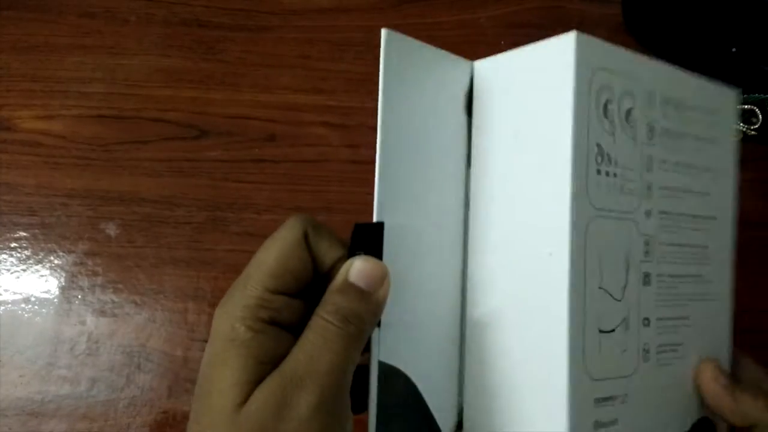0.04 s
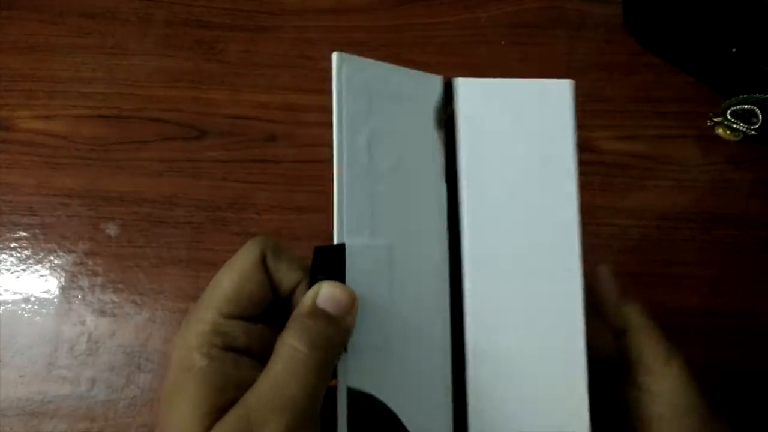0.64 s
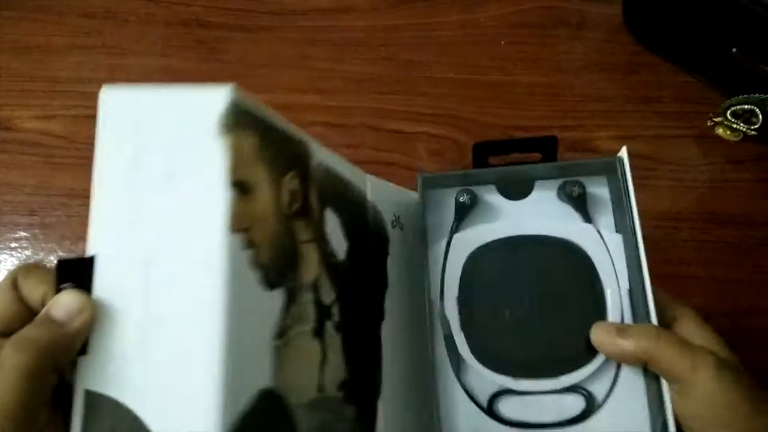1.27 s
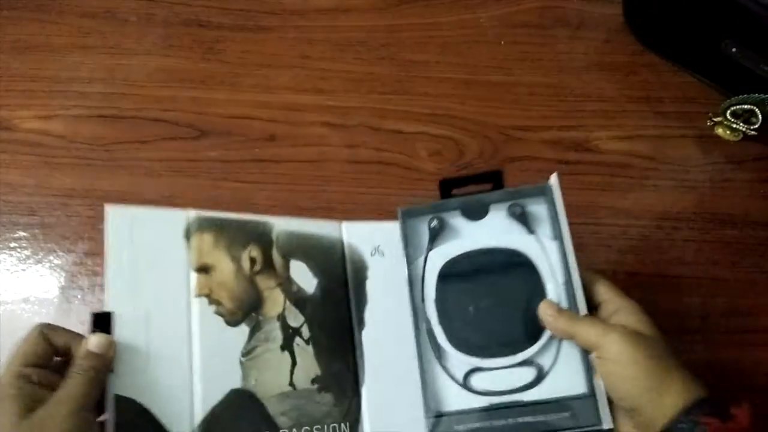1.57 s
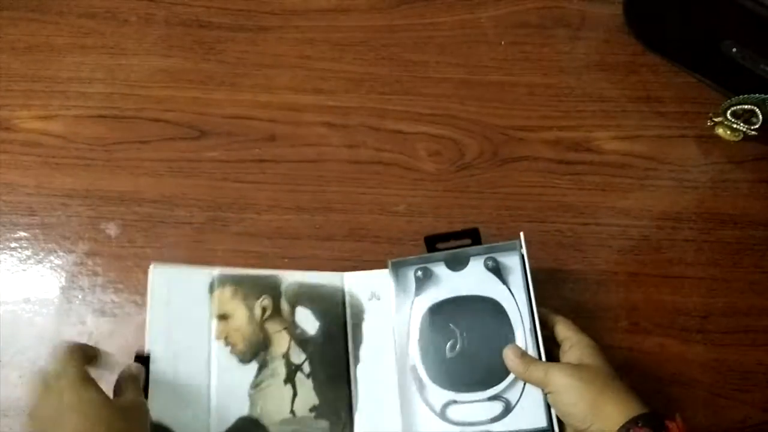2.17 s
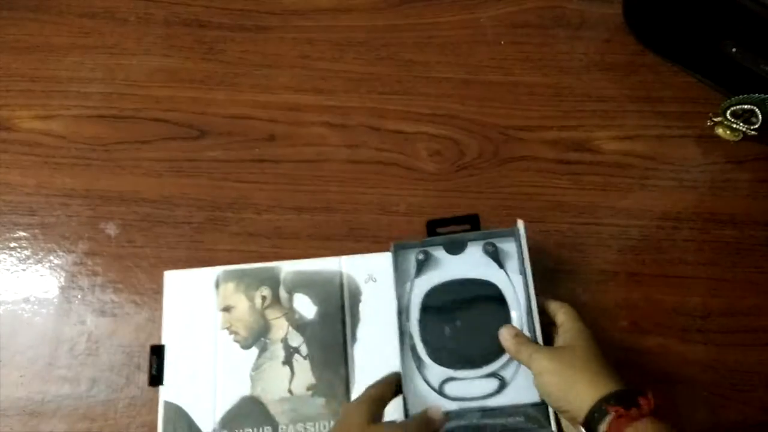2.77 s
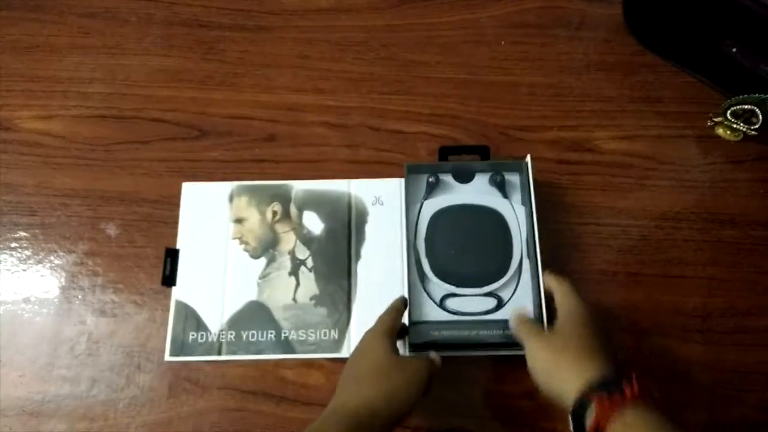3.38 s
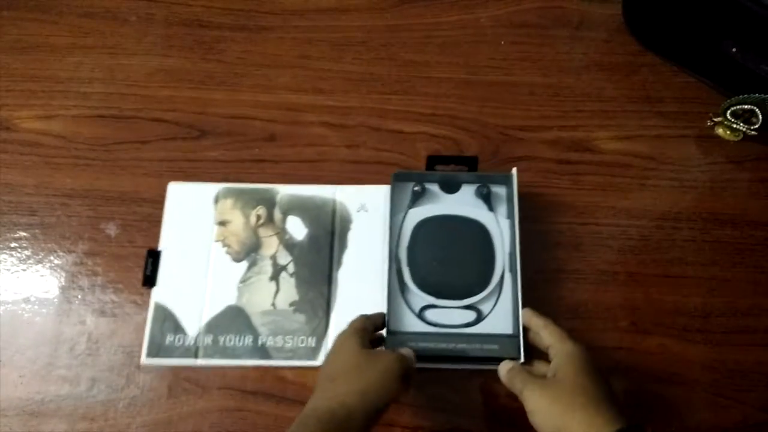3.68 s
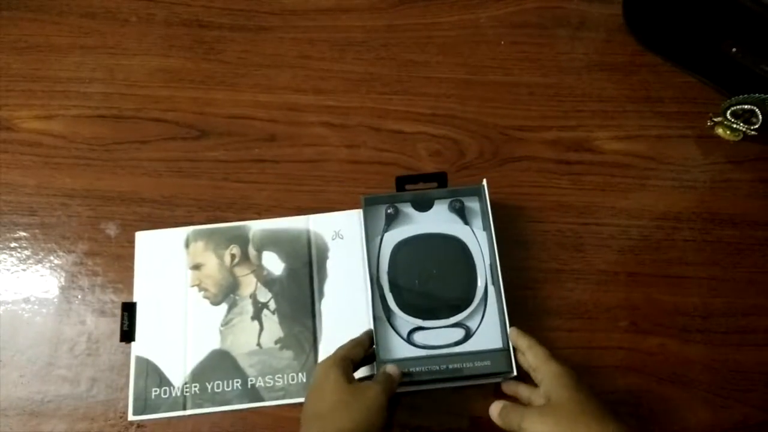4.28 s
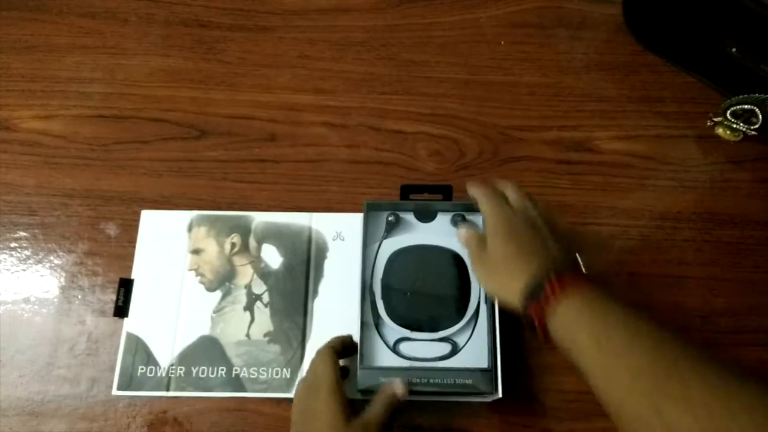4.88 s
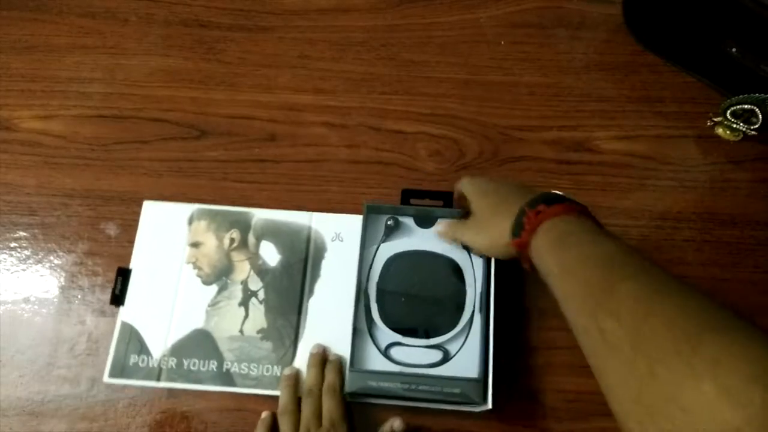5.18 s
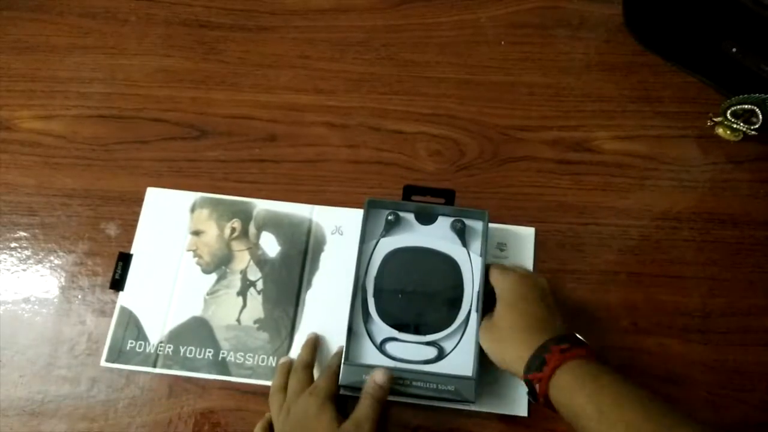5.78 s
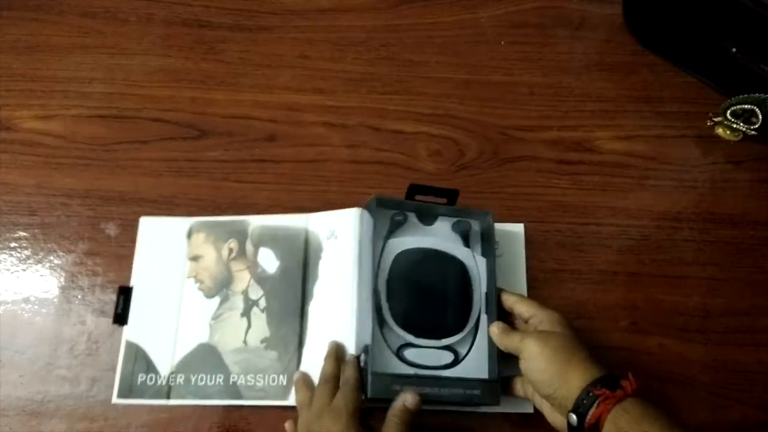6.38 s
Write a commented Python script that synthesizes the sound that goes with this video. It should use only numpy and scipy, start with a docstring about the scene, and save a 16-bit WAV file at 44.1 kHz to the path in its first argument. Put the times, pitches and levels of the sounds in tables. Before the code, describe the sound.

Soft cardboard rubbing and scraping, broken by light knocks, sharp clicks and low thumps on a table, over a faint hum.

```python
"""A low drone sinks away under the soft hiss of sliding card: a cardboard box with a plastic window is
being unfolded on a wooden table in a small bare room. Faces rub, edges scrape, panels knock, and the
cover's plastic tab snaps onto the wood and rings. The hollow box rumbles as hands push it, squeals
thinly as it turns, and is set down with thumps that boom in the low modes of table and room.
A faint hum and hiss lie underneath."""
import sys
import numpy as np
from scipy import signal
from scipy.fft import rfft, irfft, next_fast_len
from scipy.io import wavfile
from scipy.ndimage import uniform_filter1d, map_coordinates

SR = 44100
rng = np.random.default_rng(int(sys.argv[2]) if len(sys.argv) > 2 else 0)


def put_to_file(sound):
    """Save the sound as 16-bit audio at rate SR, in the file named by the first command-line argument."""
    columns = np.atleast_2d(sound).T  # one column per channel
    safe = np.clip(columns, -1, 1)
    whole_steps = np.round(safe * 32767)
    wavfile.write(sys.argv[1], SR, whole_steps.astype(np.int16))


N = 292691

# Room tone, steady hum and opening drone: f/Hz, rms level/dB
HUM_TONES = [(72, -69), (100, -81), (240, -81), (300, -77)]
DRONE_TONES = [(236, -69), (296, -68.5)]
# Reverb decay: f/Hz, t60/s
ROOM_DECAY = [(100, 1), (300, 0.97), (700, 0.73), (2000, 0.85), (6000, 0.6), (10000, 0.58), (16000, 0.45)]
# Stereo image of diffuse and of direct sound: f/Hz, left-right correlation
DIFFUSE_IMAGE = [(100, 0.89), (300, 0.81), (600, 0.53), (1200, 0.0065), (3000, 0.045), (16000, 0)]
DIRECT_IMAGE = [(100, 0.98), (500, 1), (1200, 0.12), (5000, 0.07), (16000, 0.039)]
# Stereo balance: f/Hz, left minus right/dB
BALANCE = [(60, 5.5), (150, 1), (700, 1.5), (2000, 2.5), (4800, 2), (5900, -1), (7700, -5), (10000, -1.5),
           (15000, -4)]

# Noise colours: f/Hz, relative level/dB
ROOM_TONE_EQ = [(20, -18), (35, -19), (55, 7), (78, -12), (130, 0.5), (200, -6), (300, -4.5), (600, -18.5),
                (1100, -14.5), (3900, -19.5), (6400, -16.5), (10000, -25), (16000, -25)]  # background hiss
REVERB_EQ = [(40, -2), (100, 0.5), (300, 3.5), (700, 0.5), (1300, 1.5), (3000, -3.5), (6500, -4.5),
             (9000, -3.5), (16000, -3)]  # the room's reflections
RUMBLE_EQ = [(20, -32), (38, -12), (55, -3.5), (72, -1.5), (100, 3), (125, -10.5), (160, -3), (260, -58.5),
             (600, -44)]  # box pushed over the table top
HOLLOW_EQ = [(110, 4.5), (200, 2.5), (320, 2.5), (480, -1), (650, -1.5), (1000, -13.5), (1800, -28.5)]  # rubbing heard through the hollow box
SCRAPE_EQ = [(500, -10.5), (1000, -1.5), (1600, 1.5), (2300, -1), (4000, -3.5), (6000, -2), (9000, -15),
             (16000, -60)]  # card edges
PAPER_EQ = [(1500, -23), (3300, -7.5), (5000, -3.5), (6300, 1), (8000, -3), (10000, -10), (13000, -11.5),
            (15800, -6)]  # coated faces
SIZZLE_EQ = [(3000, -29), (6500, 4), (8500, 3), (11000, 2.5), (15800, -2.5)]  # top end of fast strokes
THUD_EQ = [(40, -33), (100, -4.5), (210, -2), (340, -6.5), (470, -13), (640, -10.5), (1100, -23),
           (2500, -49)]  # soft, heavy contact
CRACK_EQ = [(200, -18), (400, -4), (620, -10), (950, -3.5), (1600, -24), (2030, -6), (2400, -7),
            (3900, -3.5), (4600, -4), (6000, 1), (7500, -7), (8800, -12.5), (11000, -24), (16000, -26.5)]  # hard edge contact
# Colours that follow a pitch: multiple of that pitch, relative level/dB
RASP_EQ = [(.3, -39), (.6, -4), (.8, 2), (1.2, 3), (1.5, -6), (2.2, -27)]  # dragged edge
PANEL_EQ = [(.2, -20), (.5, -12), (1, 1.5), (1.5, -9.5), (2.5, -12.5), (4.5, -24), (10, -55)]  # papery crack of a knock

# Hands push the box: start/s, hold/s, rumble level/dB, hollow rub level/dB
BOX_PUSHES = [(0, 0.57, -75, -67.5), (0.867, 0.32, -72, -69), (1.35, 0.3, -71, -70.5),
              (1.85, 0.9, -66.5, -65.5), (2.797, 0.8, -57.5, -66), (3.553, 0.57, -57, -62),
              (4.116, 1, -61, -64), (5.02, 0.3, -53.5, -57.5), (5.464, 0.3, -55.5, -64.5),
              (6.037, 0.4, -59.5, -56), (6.425, 0.2, -57.5, -60.5)]
# Thin squeal of the turning box: t/s, f/Hz, level/dB
SQUEAL_PATH = [(4.51, 14000, -86), (4.545, 14450, -63), (4.59, 15700, -66), (4.665, 15500, -65),
               (4.715, 13900, -63), (4.77, 14160, -78), (4.83, 13800, -70), (4.875, 14300, -66),
               (4.92, 15600, -66), (5.02, 15000, -71), (5.12, 15800, -80), (5.24, 15300, -69),
               (5.31, 14000, -69), (5.36, 13000, -90)]
# Squeaks of the plastic window: start/s, length/s, level/dB, f/Hz
WINDOW_SQUEAKS = [(2.123, 0.063, -68, 7100), (4.76, .19, -71, 6100)]
# Strokes of card and fingers: t/s at top speed, rise/s, fall/s, hiss level/dB, scrape level/dB
CARD_STROKES = [(.17, 0.19, 0.087, -64, -75), (.335, 0.017, 0.062, -61, -79),
                (.405, 0.044, 0.18, -55, -72.5), (.64, 0.11, 0.059, -65.5, -78),
                (.88, 0.037, 0.11, -58, -70), (1.01, 0.12, 0.14, -60, -72), (1.16, 0.11, .13, -54, -79),
                (1.25, 0.11, 0.12, -53.5, -84), (1.42, 0.097, 0.22, -60, -68.5),
                (1.63, .14, 0.12, -57.5, -83.5), (1.72, 0.15, 0.13, -59, -89),
                (1.92, 0.12, 0.088, -66, -74.5), (2.22, 0.033, 0.033, -65, -76),
                (2.9, 0.21, 0.14, -64, -62.5), (3.06, 0.16, 0.11, -54.5, -62),
                (3.2, 0.11, 0.12, -57.5, -61.5), (3.47, 0.42, 0.16, -62.5, -78),
                (3.7, 0.18, 0.34, -65, -63.5), (3.878, 0.044, 0.21, -60, -61),
                (4.57, 0.11, 0.79, -63.5, -63.5), (4.93, 0.075, 0.73, -65, -64),
                (5.14, 0.1, 0.11, -56, -61), (5.3, 0.23, 0.072, -64.5, -60.5),
                (5.437, 0.0081, 0.027, -57.5, -65), (5.599, 0.28, 0.14, -58, -65),
                (5.741, 0.0065, 0.07, -57.5, -58), (5.8, 0.06, 0.12, -53, -75),
                (5.91, 0.12, 0.11, -57, -57), (6.17, 0.2, 0.13, -65.5, -61.5),
                (6.3, 0.016, 0.054, -61.5, -61.5), (6.391, 0.042, 0.065, -64, -59.5),
                (6.49, 0.068, 0.07, -63, -71)]
# A card edge catches and drags: start/s, hold/s, level/dB, centre f/Hz
EDGE_DRAGS = [(4.557, 0.051, -63, 3240), (5.43, 0.014, -57, 4600), (5.748, 0.058, -53, 5200),
              (6.282, 0.0083, -57.5, 4600), (6.464, 0.018, -58.5, 4930)]
# Panels knocked by fingers and table: t/s, level/dB, f/Hz, cycles to fall 60 dB
PANEL_KNOCKS = [(.315, -56, 513, 8.7), (.783, -57.5, 1120, 38), (.785, -61, 615, 20),
                (.9245, -45.5, 530, 21), (1.286, -39.5, 948, 42), (1.29, -51, 310, 35),
                (1.348, -52.5, 580, 22), (1.785, -59.5, 600, 22), (1.914, -57, 650, 17),
                (2.361, -34.5, 900, 43), (2.367, -37.5, 587, 160), (2.368, -41.5, 156, 120),
                (2.534, -55, 1300, 19), (2.5375, -42, 630, 8.4), (2.5415, -44.5, 1100, 22),
                (2.857, -53.5, 920, 12), (3.2145, -44, 630, 16), (3.2249, -43.5, 980, 14),
                (3.227, -36, 640, 25), (3.564, -54, 735, 23), (3.722, -56.5, 1350, 29),
                (3.7734, -47.5, 1490, 28), (3.870, -48, 670, 14), (4.0066, -54, 704, 28),
                (4.0443, -44, 700, 17), (4.578, -52, 625, 71), (5.013, -57, 686, 40),
                (5.138, -43, 790, 10.5), (5.146, -44.5, 650, 25), (5.182, -49, 790, 20),
                (5.276, -53.5, 600, 11), (5.3107, -51, 850, 8.9), (5.4284, -55, 747, 22),
                (5.637, -58, 910, 8.9), (5.767, -49, 680, 15), (5.7981, -33, 3820, 37),
                (5.8212, -31.5, 3600, 14), (5.8225, -49, 795, 26), (5.829, -35.5, 725, 37),
                (6.2447, -55, 624, 15), (6.299, -52, 680, 36), (6.3879, -40.5, 547, 19),
                (6.476, -53, 750, 67), (6.6245, -41, 630, 62)]
# Sharp contacts of plastic and card edges: t/s, level/dB, t60/s, top treble boost/dB
EDGE_CLICKS = [(0.192, -50.5, 0.028, 33), (.783, -63, .015, 15), (0.8848, -48.5, 0.014, 11),
               (1.2851, -45.5, 0.02, 2), (2.1292, -57.5, 0.031, -1), (2.3607, -22, 0.013, 8),
               (2.362, -21.5, 0.01, 11.5), (2.3641, -24, 0.0076, -5), (2.3671, -28, 0.029, -21),
               (2.533, -38.5, 0.0056, 44), (2.857, -53.5, 0.038, -21), (2.941, -60, .03, -15),
               (3.2244, -48.5, 0.051, 8), (3.7729, -39, 0.059, 20.5), (3.984, -58, .015, 19),
               (4.234, -63, .02, -5), (4.372, -61, 0.021, -15), (5.138, -48.5, 0.04, 9),
               (5.31, -52, .018, 9.5), (5.798, -36.5, 0.039, 22), (5.8074, -37.5, 0.055, -23),
               (5.8209, -30, 0.048, -2), (6.497, -52.5, 0.037, 13), (6.57, -49, 0.024, 22),
               (6.584, -50.5, 0.059, 23), (6.622, -44, 0.071, 0)]
# The box's weight lands: t/s, boom send/dB, thud level/dB, air push level/dB, ring time factor
BOX_LANDINGS = [(.893, -58.5, -54.5, -61, 0.32), (1.287, -54.5, -59, -57, 0.18),
                (2.128, -46, -61, -60, 0.56), (2.364, -47.5, -36, -33, 1),
                (2.535, -37.5, -42.5, -28.5, 0.89), (3.2256, -33.5, -34.5, -23, 0.96),
                (4.044, -56.5, -50.5, -55, 0.81), (4.585, -50.5, -49.5, -56, 0.73),
                (5.013, -52.5, -55.5, -50, 1.2), (5.136, -48.5, -60, -48, 0.42),
                (5.335, -45.5, -71, -56, 0.4), (5.826, -44.5, -53, -54, 0.78),
                (6.388, -55.5, -49, -39, 1.5), (6.626, -60, -61, -50, .5)]
# Ringing modes: f/Hz, relative level/dB, t60/s
TAB_MODES = [(554, -14, 0.79), (930, -3, 0.58), (1116, -2, 0.25), (1810, 4, 0.14), (2055, -1, 0.24),
             (2660, -11, 0.27), (2815, 5, 0.17), (3600, 5, 0.16), (4960, 2, 0.15), (5340, -3, 0.11),
             (5700, -7, 0.2), (5860, 5, 0.17), (6290, -3, 0.27), (6800, -3, 0.19)]  # cover and plastic tab
BOOM_MODES = [(54, -15, 2.1), (90.9, -7, 1.98), (103.6, 4, 0.71), (141.6, -12, 1.8), (158.3, -14.5, 1.57),
              (199, -22.5, 1.8), (240.7, -22.5, 1.13), (309, -21.5, 1.1), (365, -12.5, 0.51),
              (556, -19, 0.57), (613, -12, 0.27)]  # table and room


def amp(db):
    """Decibels to gain."""
    return 10 ** (np.asarray(db) / 20)


def unit(x):
    """x at rms 1."""
    return x / np.sqrt(np.mean(x ** 2) + 1e-20)


def peak_one(x):
    """A hit scaled to rms 1 in its loudest 3 ms."""
    return x / np.sqrt(uniform_filter1d(np.mean(x ** 2, 0), size=132).max())


def along(points, hz):
    """Read (f/Hz, value) points on a log frequency axis."""
    freqs, values = np.transpose(points)
    return np.interp(np.log(hz + 1), np.log(freqs + 1), values)


def wobble(rate):
    """Smooth random modulation, rate knots a second."""
    return map_coordinates(rng.standard_normal(int(N * rate / SR) + 4), [np.arange(N) * rate / SR])


def fade(t, t60):
    """Exponential decay, 60 dB down at t60."""
    return np.exp(-np.log(1000) * t / max(t60, 1e-3))


def swell_db(gestures, growth=1):
    """Summed level of (start/s, attack/s, hold/s, release/s, level/dB) moves; gain is speed ** growth."""
    t, power = np.arange(N) / SR, np.full(N, amp(-120) ** 2)
    for s, attack, hold, release, db in gestures:
        speed = np.interp(t, s + np.cumsum([0, attack, hold, release]), [0, 1, 1, 0])
        power += (amp(db) * speed ** growth) ** 2
    return 10 * np.log10(power)


def add(track, s, sound):
    """Mix a sound into the track from time s on."""
    part = track[:, max(round(s * SR), 0):][:, :sound.shape[-1]]
    part += sound[..., :part.shape[1]]


def colour(pair, eq, image):
    """Give two unrelated noises a minimum-phase EQ and a stereo image, at rms 1."""
    n = pair.shape[1]
    m = 2 * next_fast_len(n // 2 + 2048)
    hz = np.fft.rfftfreq(m, 1 / SR)
    cepstrum = irfft(np.log(amp(along(eq, hz))))
    cepstrum[1:m // 2] *= 2
    cepstrum[m // 2 + 1:] = 0  # no pre-ring
    width = np.arccos(np.clip(along(image, hz), -1, 1)) / 2
    shaped = rfft(pair, m) * np.exp(rfft(cepstrum))
    mid, side = irfft(shaped * [np.cos(width), np.sin(width)])[:, :n]
    return unit(np.array([mid + side, mid - side]))


def room_tone(hiss_db=-65.5, drone_hold_s=0.22, drone_release_s=0.15, drone_waver_db=3):
    """The bed: steady hiss, a slightly wavering hum, and a low drone that soon sinks away."""
    t = np.arange(N) / SR
    tone = lambda hz: np.sqrt(2) * np.sin(2 * np.pi * hz * t + wobble(2.81))
    hum = sum(amp(db) * tone(hz) for hz, db in HUM_TONES)
    drone = sum(amp(db + drone_waver_db * wobble(16.7)) * tone(hz) for hz, db in DRONE_TONES)
    drone *= np.clip(1 - (t - drone_hold_s) / drone_release_s, 0, 1)
    hiss = amp(hiss_db) * colour(rng.standard_normal((2, N)), ROOM_TONE_EQ, DIFFUSE_IMAGE)
    return hum + drone + hiss


def room_tails(count=6, build_s=0.0012):
    """Reverb tails for several spots on the table: quick to build, longest in the bass."""
    noise = np.array([colour(rng.standard_normal((2, SR)), REVERB_EQ, DIFFUSE_IMAGE)
                      for _ in range(count)])
    hz, t, bands = signal.stft(noise, SR, nperseg=256)
    decay = np.exp(-np.log(1000) * t / along(ROOM_DECAY, hz)[:, None])
    tails = signal.istft(bands * decay * (1 - np.exp(-t / build_s)), SR, nperseg=256)[1]
    return tails / np.linalg.norm(tails, axis=-1, keepdims=True)


def in_room(hit, tails, wet_db, smooth_bins=260):
    """A dry hit plus one of the room's tails, which takes on only the hit's broad colour."""
    lead = SR // 10
    tail = np.pad(tails[rng.integers(len(tails))], ((0, 0), (lead, 0)))
    m = next_fast_len(tail.shape[1])
    power = uniform_filter1d(np.mean(np.abs(rfft(hit, m)) ** 2, 0), size=smooth_bins)
    out = amp(wet_db) * irfft(rfft(tail, m) * np.sqrt(np.abs(power)), m)[:, lead:]
    add(out, 0, hit)
    return out


def patchy(x, depth_db=2.3):
    """The colour of a rub shifts in patches as the contact wanders over the surface."""
    bands = signal.stft(x, nperseg=512)[2]
    patches = uniform_filter1d(rng.standard_normal(bands.shape[1:]), size=4, axis=0)
    patches = uniform_filter1d(patches, size=9, axis=1)
    return signal.istft(bands * amp(depth_db * unit(patches)), nperseg=512)[1][:, :N]


def friction(eq, catches_per_s, grain_db, grip_db):
    """Rubbing at rms 1: countless tiny slips and some larger catches, under a fluttering grip."""
    caught = rng.random(N) < catches_per_s / SR
    catches = caught * rng.exponential(1, (2, N)) * rng.choice([-1, 1], N)
    slips = patchy(rng.standard_normal((2, N))) + amp(grain_db) * unit(catches)
    return colour(slips * amp(grip_db * wobble(110)), eq, DIFFUSE_IMAGE)


def box_rumble(attack_s=0.26, release_s=0.17):
    """The hollow box and the table top rumble for as long as the hands push."""
    rumble_db = swell_db([(s - attack_s, attack_s, hold, release_s, db) for s, hold, db, _ in BOX_PUSHES])
    rub_db = swell_db([(s - attack_s, attack_s, hold, release_s, db) for s, hold, _, db in BOX_PUSHES])
    rumble = amp(rumble_db) * friction(RUMBLE_EQ, catches_per_s=21, grain_db=-21, grip_db=2)
    rub = amp(rub_db) * friction(HOLLOW_EQ, catches_per_s=40, grain_db=-11, grip_db=2.2)
    return rumble + rub


def fuzzy_tone(hz, width_hz):
    """A stereo tone smeared into a narrow band by fast pitch jitter."""
    jitter = np.array([wobble(900), wobble(900)])
    return np.sin(2 * np.pi * np.cumsum(hz + width_hz * jitter, axis=1) / SR)


def squeals(flicker_db=5.5, waver_hz=170):
    """The turning box squeals at the top of hearing; its plastic window adds short, lower squeaks."""
    t = np.arange(N) / SR
    times, pitches, levels = np.transpose(SQUEAL_PATH)
    gate = (t > times[0]) & (t < times[-1])
    level_db = np.interp(t, times, levels) + flicker_db * (wobble(28) + wobble(170)) / 2
    pitch_hz = np.interp(t, times, pitches) + waver_hz * wobble(45)
    out = gate * amp(level_db) * fuzzy_tone(pitch_hz, width_hz=330)
    for s, length, db, hz in WINDOW_SQUEAKS:
        arch = np.sin(np.pi * np.clip((t - s) / length, 0, 1))
        out += amp(db) * arch * fuzzy_tone(hz, width_hz=70)
    return out


def card_slides(brisk_hiss_db=-54, brisk_sizzle_db=-58, sizzle_growth=2.65):
    """Edges scrape and coated faces hiss with the speed of each stroke; faster strokes are brighter."""
    hiss_db = swell_db([(s - rise, rise, 0, fall, db) for s, rise, fall, db, _ in CARD_STROKES],
                       growth=0.76)
    scrape_db = swell_db([(s - rise, rise, 0, fall, db) for s, rise, fall, _, db in CARD_STROKES],
                         growth=0.35)
    sizzle_db = brisk_sizzle_db + sizzle_growth * (hiss_db - brisk_hiss_db)
    scrape = amp(scrape_db) * friction(SCRAPE_EQ, catches_per_s=200, grain_db=-11.5, grip_db=2)
    hiss = amp(hiss_db) * friction(PAPER_EQ, catches_per_s=220, grain_db=-7.5, grip_db=1.5)
    sizzle = amp(sizzle_db) * friction(SIZZLE_EQ, catches_per_s=700, grain_db=-5, grip_db=1.8)
    return scrape + hiss + sizzle


def edge_rasps(attack_s=0.0065, release_s=0.018):
    """Spiky slips of a dragged edge sound through the card's broad resonance."""
    out, t = np.zeros((2, N)), np.arange(SR // 8) / SR
    for s, hold, db, hz in EDGE_DRAGS:
        eq = [(hz * multiple, level) for multiple, level in RASP_EQ]
        slips = colour(rng.laplace(size=(2, len(t))), eq, DIFFUSE_IMAGE)
        grip = np.interp(t, np.cumsum([0, attack_s, hold, release_s]), [0, 1, 1, 0])
        add(out, s - attack_s, amp(db) * grip * slips)
    return out


def burst(eq, t60):
    """The noise transient of a contact."""
    t = np.arange(SR // 10) / SR
    return peak_one(colour(rng.standard_normal((2, len(t))) * fade(t, t60), eq, DIRECT_IMAGE))


def fold_creak(start_s=1.4065, gap_s=0.0385, db=-55, hz=700, cycles=7):
    """The fold slips in four dull, dead ticks of scattered pitch, given as rows of panel knocks."""
    return [(start_s + k * gap_s, db, hz * np.exp(0.27 * rng.normal()), cycles) for k in range(4)]


def panel_knocks(tails, crack_db=-6):
    """A struck panel gives a damped tone amid a papery crack."""
    out, t = np.zeros((2, N)), np.arange(SR // 4) / SR
    for s, db, hz, cycles in PANEL_KNOCKS + fold_creak():
        t60 = cycles / hz
        eq = [(hz * multiple, level) for multiple, level in PANEL_EQ]
        knock = np.sin(2 * np.pi * hz * t) * fade(t, t60) * np.ones((2, 1))
        add(knock, 0, amp(crack_db) * burst(eq, t60))
        add(out, s, amp(db) * in_room(peak_one(knock), tails, wet_db=-11))
    return out


def edge_clicks(tails, left_db=1):
    """Hard edges strike with a crack, a little to the left; the harder the edge, the more top treble."""
    out = np.zeros((2, N))
    shelf = [(5500, 0.034), (13000, 0.94)]  # f/Hz, share of the boost
    pan = amp([[left_db / 2], [-left_db / 2]])
    for s, db, t60, top_db in EDGE_CLICKS:
        eq = [(hz, level + top_db * along(shelf, hz)) for hz, level in CRACK_EQ]
        add(out, s, amp(db) * in_room(burst(eq, t60) * pan, tails, wet_db=-3.5, smooth_bins=1300))
    return out


def tab_ring(snap_s=2.3626, level_db=-45):
    """The cover rings after its tab hits the wood; each mode has its own phase left and right."""
    out, t = np.zeros((2, N)), np.arange(SR // 2) / SR
    for hz, db, t60 in TAB_MODES:
        phase = rng.normal(0, 0.84, (2, 1))
        add(out, snap_s, amp(level_db + db) * np.sin(2 * np.pi * hz * t + phase) * fade(t, t60))
    return out


def box_thumps(tails, push_hz=184, swell_s=0.0052, boom_gain_db=3):
    """The box lands: a push of air from under its flat face, a thud, then low modes swell and beat."""
    out, t = np.zeros((2, N)), np.arange(SR + SR // 2) / SR
    push = np.sin(2 * np.pi * push_hz * t) * fade(t, t60=0.029)
    push = push[:SR // 10] * np.ones((2, 1))
    for s, boom_db, thud_db, push_db, ring in BOX_LANDINGS:
        modes = sum(amp(db + rng.normal()) * np.sin(2 * np.pi * hz * t) * fade(t, t60 * ring)
                    for hz, db, t60 in BOOM_MODES)
        add(out, s, amp(boom_db + boom_gain_db) * modes * (1 - np.exp(-t / swell_s)))
        add(out, s, amp(thud_db) * in_room(burst(THUD_EQ, t60=0.02), tails, wet_db=-3))
        add(out, s, amp(push_db) * in_room(push, tails, wet_db=-12, smooth_bins=60))
    return out


def scene():
    """Hits and rubbing over the room tone."""
    tails = room_tails()
    hits = edge_clicks(tails) + tab_ring() + panel_knocks(tails) + box_thumps(tails)
    rubbing = card_slides() + edge_rasps() + box_rumble() + squeals()
    return hits + rubbing + room_tone()


def record(dry, low_cut_hz=48, top_hz=15950):
    """Master EQ: a low cut, a different colour left and right, and a brick wall at the top."""
    m = next_fast_len(N + SR // 2)
    hz = np.fft.rfftfreq(m, 1 / SR)
    lean_db = along(BALANCE, hz) / 2
    trimmed = signal.sosfilt(signal.butter(4, low_cut_hz, "high", fs=SR, output="sos"), dry)
    return irfft(rfft(trimmed, m) * amp([lean_db, -lean_db]) * (hz < top_hz), m)[:, :N]


dry = scene()
out = record(dry)
put_to_file(out)
```